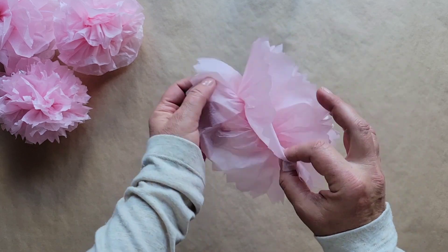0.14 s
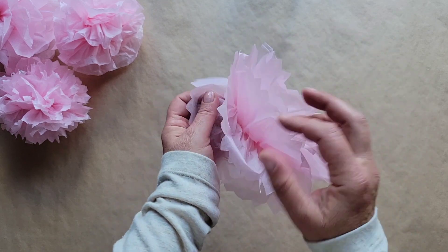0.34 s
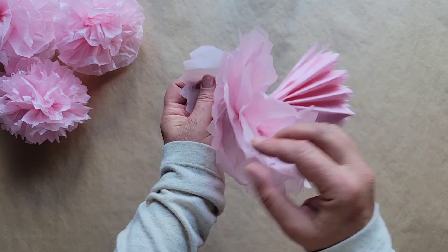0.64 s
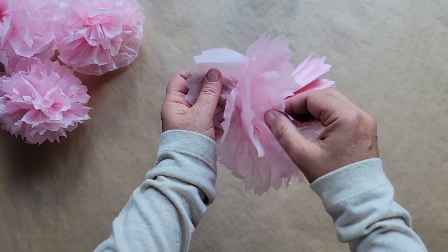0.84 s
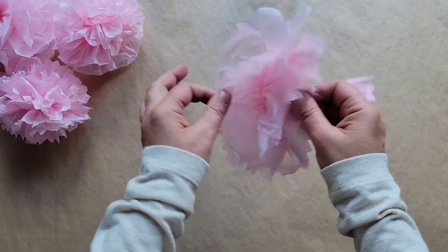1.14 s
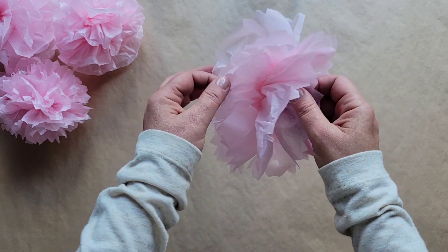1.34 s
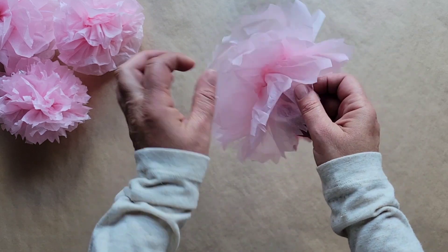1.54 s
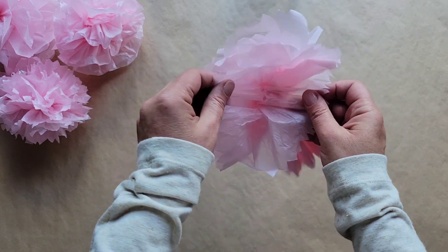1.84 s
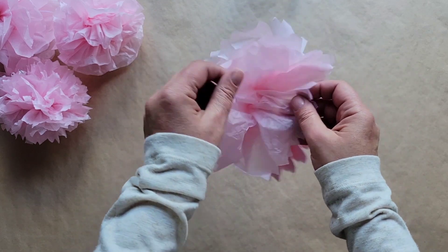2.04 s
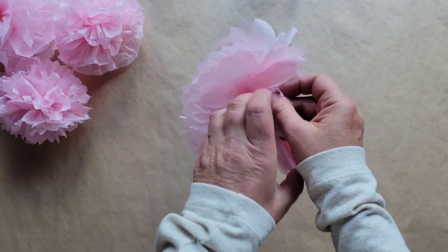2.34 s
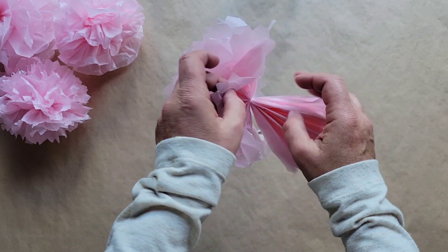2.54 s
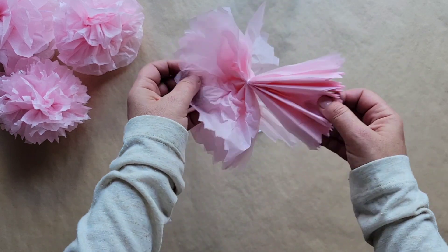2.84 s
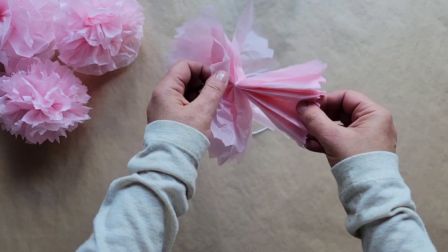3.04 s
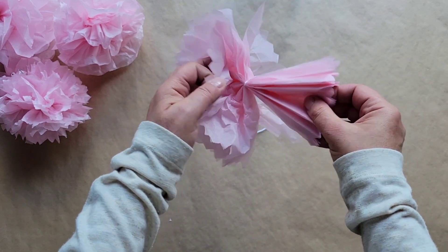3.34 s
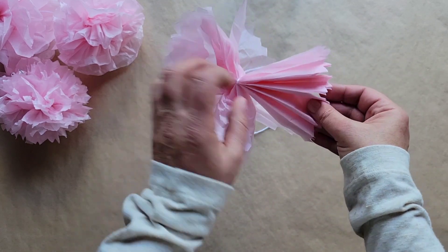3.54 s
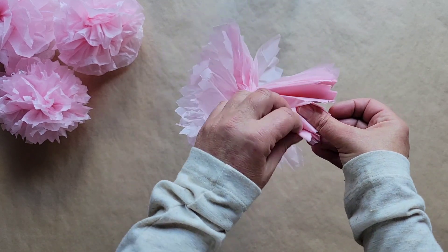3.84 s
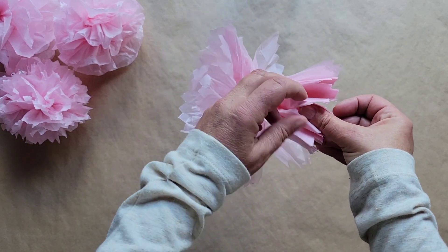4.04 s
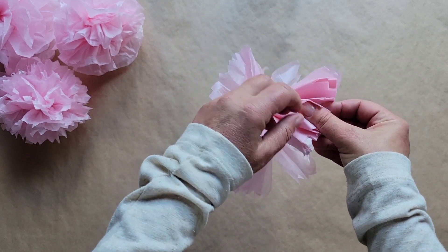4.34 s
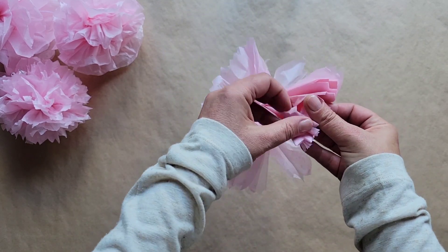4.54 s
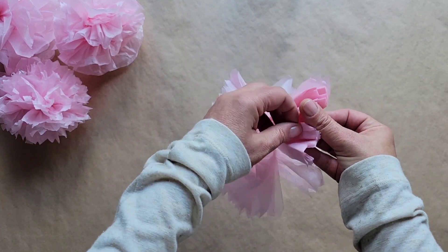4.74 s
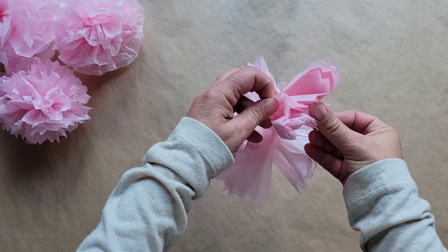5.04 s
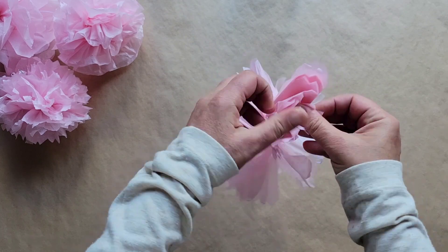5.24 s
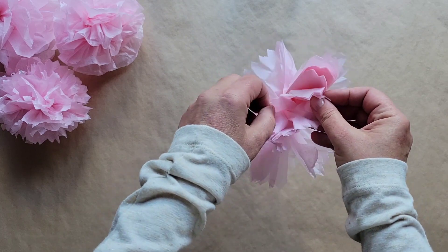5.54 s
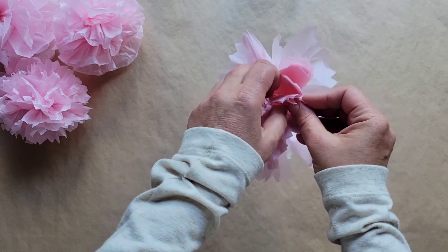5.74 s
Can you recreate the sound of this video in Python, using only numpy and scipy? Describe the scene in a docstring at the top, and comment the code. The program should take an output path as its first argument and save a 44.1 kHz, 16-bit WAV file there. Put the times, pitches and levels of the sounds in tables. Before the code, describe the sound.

Two hands separate and fluff a tissue-paper flower close to a stereo microphone pair. Crisp, papery crinkles come in quick uneven strokes, with sharp little crease snaps, light hollow flexing and soft low puffs of air. The first three seconds are busiest; around four seconds it thins to quieter rubbing, then crinkling returns, strongest near the end. Quiet indoor room, faint hush.

```python
"""The layers of a tissue-paper flower, pulled apart and fluffed by two hands, close above a craft table in a quiet room.
Each finger stroke drives a swarm of tiny buckles: noise bursts filtered into crinkle, crisp treble, rubbed pleats
and the hollow flexing of the petals. Single creases snap as short ringing bursts and jolt their petal.
Opening petals push soft puffs of low noise, over the room's faint hush, on a microphone pair:
alike in the bass and more independent in the treble."""
import sys
import numpy as np
from scipy import signal
from scipy.fft import rfft, irfft
from scipy.io import wavfile
from scipy.ndimage import uniform_filter1d

SR = 44100
rng = np.random.default_rng(int(sys.argv[2]) if len(sys.argv) > 2 else 0)


def transcribe(signal):
    """Save signal, clipped to [-1, 1], as a 16-bit WAV file at the path in sys.argv[1]."""
    frames = np.atleast_2d(signal).T
    limited = np.clip(frames, -1, 1)
    pcm = np.round(limited * 32767).astype(np.int16)
    wavfile.write(sys.argv[1], SR, pcm)


N = 260626
TIME = np.arange(N) / SR   # s

# Strokes of the fingers through the paper: start t/s, length t/s, relative crinkle level/dB,
# swell over the stroke/dB, crisp treble against crinkle level/dB, flexing against crinkle level/dB
FINGER_STROKES = [(0.0, 0.049, -34, 1.5, 3.5, -8.0), (0.095, 0.225, -43.5, -6.5, 1.5, -15.5),
                  (0.219, 0.008, -42, 9, -12, -3.5), (0.336, 0.04, -52.5, 3.5, -7, -19),
                  (0.412, 0.042, -51.5, 1.0, 7.5, -11), (0.466, 0.16, -41.5, -8.5, 1.5, -9),
                  (0.686, 0.031, -63, -6, 0, -29), (0.8, 0.014, -42.0, -1, 10, -15),
                  (0.827, 0.11, -47.5, -9, 0.5, -9), (1.013, 0.019, -54, 0.0, 1.5, -7),
                  (1.067, 0.035, -37.5, 0, 5, -12.5), (1.123, 0.04, -35.5, -4.5, 3, -10.5),
                  (1.189, 0.15, -48.0, 4.5, 1, -13.5), (1.366, 0.029, -40, 5, -1.5, -6.5),
                  (1.456, 0.035, -42.5, 1.5, 0, -12.5), (1.65, 0.026, -51.5, 3, -2, -10.5),
                  (1.694, 0.056, -43, 2, 3.0, -12.0), (1.761, 0.045, -35.5, 2.5, 3.5, -10.5),
                  (1.841, 0.15, -44.5, 0.5, 2.0, -12.5), (2.015, 0.025, -36, 7.5, 1, -10.5),
                  (2.093, 0.053, -46.0, 2.5, -1.5, -13), (2.169, 0.112, -57.0, -0.5, -1.0, -15),
                  (2.328, 0.014, -39.5, -3.5, -1, -16.5), (2.365, 0.082, -45.5, 8, 3.5, -12.5),
                  (2.467, 0.13, -49, 4, 1, -11.5), (2.642, 0.134, -53, 3, -3.5, -11.5),
                  (2.802, 0.034, -40.5, 3, -3.5, -15), (2.877, 0.1954, -44.5, 10, 1.5, -12),
                  (3.119, 0.13, -40.5, 6, -3, -10.5), (3.282, 0.064, -42.5, 6, -2, -10.5),
                  (3.368, 0.073, -48, 0, -1, -11.5), (3.473, 0.108, -59.0, 8.5, 4.5, -7),
                  (3.601, 0.081, -43.5, -3.5, 0, -17.5), (3.732, 0.11, -56, -4.0, 3.5, -14.0),
                  (3.925, 0.076, -67, -0.5, 5, -5.5), (4.075, 0.086, -52.5, -9, -2.5, -12),
                  (4.238, 0.051, -56.5, 0.5, -10, -8.5), (4.347, 0.238, -50.5, 3, -4.5, -13.0),
                  (4.62, 0.026, -44.0, 5.5, -4, -17), (4.688, 0.11, -53.5, 8, -1.0, -27),
                  (4.827, 0.23, -42.5, 2, -2, -19.5), (5.136, 0.039, -45, 5, -3, -15.0),
                  (5.211, 0.14, -54.5, -7.5, 1, -17.5), (5.337, 0.237, -45.5, 10.5, -2.5, -14.5),
                  (5.614, 0.142, -45.5, -6, -1.0, -14.5), (5.772, 0.08, -33.0, 5.5, -1, -14.5),
                  (5.904, 0.015, -41.5, -3.5, -4, -12)]
# Fingertips in the folded pleats, a curve: t/s, rub against crinkle level/dB,
# hollow note against flexing level/dB, tilt of the pleat resonances/(dB per octave)
PLEAT_RUB = [(0, -14, -9.5, 0), (1.0, -8.5, -5, -5), (2.3, -11, -5.5, -4), (3.3, -10.5, -11, -3),
             (3.7, -9, -5, 2), (4.0, -1, 1, -9), (4.15, 7, 4, -8), (4.6, 0, 4, -10), (4.8, 8, -7, 2),
             (5.05, 5, -20.5, -4), (5.15, -0.5, -14, -3), (5.91, -25, -7.5, -8)]
# Resonances of the rubbed pleats: f/Hz, width f/Hz, relative level/dB
PLEAT_RESONANCES = [(1940, 460, 0.5), (2960, 100, 6), (3406, 420, 12), (4750, 1200, 6.5)]
# Stiff creases that snap through: t/s, relative level/dB, pitch centre f/Hz, left-right level/dB
CREASE_SNAPS = [(.008, -18, 5300, 1), (.2313, -23, 2800, -1), (.2947, -24, 2200, 1), (.3229, -26, 1800, 2),
                (.41, -28, 9000, 0), (.46, -22, 9000, 0), (.467, -16, 9100, 2), (.689, -42, 4600, -1),
                (.7665, -45, 9200, 2), (.795, -18, 11700, -2), (1.013, -36, 4800, 1), (1.135, -22, 1400, 0),
                (1.328, -26, 8800, 1), (1.459, -25, 7100, 0), (1.4834, -25, 5500, 1), (1.624, -32, 8900, 2),
                (1.692, -23, 8700, -1), (1.937, -19, 9400, 0), (1.969, -22, 10800, 1),
                (1.975, -22, 10800, 2), (2.2964, -40, 5100, 0), (2.321, -26, 3400, 0),
                (2.421, -23, 8900, -1), (2.627, -31, 1800, 0), (2.804, -23, 4700, 1), (2.83, -16, 5400, 2),
                (2.8366, -21, 10000, 2), (3.04, -22, 8000, 2), (3.16, -23, 1400, 0), (3.524, -32, 7400, -1),
                (3.594, -26, 5900, -2), (3.731, -27, 5700, -3), (3.89, -37, 6300, -4),
                (3.923, -44, 3500, -3), (4.04, -41, 5900, 0), (4.209, -39, 1500, -1),
                (4.267, -31, 5800, -2), (4.344, -34, 4800, -1), (4.395, -25, 5200, -2),
                (4.763, -29, 6900, -1), (5.262, -26, 5900, 0), (5.338, -26, 4100, -3),
                (5.45, -24, 3000, -2)]
# Petals swinging open: t/s, relative peak level/dB, swell time t/s
PETAL_PUFFS = [(.028, -48, 0.013), (.46, -58, .019), (.79, -56, 0.023), (1.085, -53, 0.011),
               (1.115, -54, 0.014), (1.375, -53, 0.015), (1.768, -47, .013), (2.036, -43.5, 0.0068),
               (2.555, -53, 0.0061), (3.048, -59, 0.012), (3.205, -53, .016), (3.3, -55, .012),
               (5.78, -59, .015), (5.86, -54, .009)]

# Colour of the papery crinkle: f/Hz, relative level/dB
CRINKLE_SPECTRUM = [(550, -36), (780, -14), (880, -11), (965, -2), (1040, -6.5), (1200, -0.5), (1430, -5),
                    (1620, -0.5), (2120, -7), (3150, -4), (3800, -8.5), (4700, -5.5), (7000, -11.5),
                    (16000, -20.5)]
# Colour of the crisp treble: f/Hz, relative level/dB
CRISP_SPECTRUM = [(40, -41), (150, -26), (1500, -21), (3500, -7.5), (5500, -3), (7000, -3.5), (9000, -1.5),
                  (11500, -4), (13000, -0.5), (16000, -4.5)]
# Colour of whole petals flexing: f/Hz, relative level/dB
FLEX_SPECTRUM = [(70, -35.5), (130, -24), (205, -15), (243, -3.5), (275, -6), (355, -3.5), (440, -1),
                 (510, 5), (600, 0), (760, -10), (1100, -28.5), (2000, -79.5)]
# Colour of the snapping creases: f/Hz, relative level/dB
SNAP_SPECTRUM = [(80, -21), (350, -5.5), (800, -12.5), (1400, -4), (3300, -8), (6000, -10), (16000, -5.5)]
# Colour of the pushed air: f/Hz, relative level/dB
PUFF_SPECTRUM = [(25, -34), (60, 0), (100, 2.5), (150, -5), (230, -1), (400, -15), (900, -48)]
# Colour of the room hush: f/Hz, relative level/dB
ROOM_SPECTRUM = [(20, -8), (60, 4), (130, -10.5), (350, 1.5), (700, -9), (1500, -9), (4000, -7),
                 (16000, -16.5)]
# Width of the microphone pair: f/Hz, side against mid level/dB
PAIR_WIDTH = [(60, -15), (140, -13), (250, -20), (360, -22), (500, -14), (750, -9.5), (1400, -8.8),
              (2500, -5.5), (4500, -3.2), (8000, -.3), (16000, 0)]
# Balance of the microphone pair: f/Hz, left against right level/dB
PAIR_BALANCE = [(300, 1), (1500, -1.5), (3200, 0.3), (4400, -4), (6000, -0.5), (7500, -0.5), (8700, 5),
                (10500, 2), (13000, 0), (16000, 3.5)]

# How each voice follows a stroke: attack/(dB per s), release/(dB per s), relative level while only held/dB
CRINKLE_RESPONSE = (690, 410, -69)
CRISP_RESPONSE = (880, 540, -74)
FLEX_RESPONSE = (560, 364, -76)
CATCH_DB, FLEX_WAVER_DB = 0.96, 1.37   # rms wander: paper catches and gives, so a stroke is never even
PLEAT_PIVOT_HZ = 3000   # the pleat tilt turns about this pitch
HOLLOW_HZ, HOLLOW_WIDTH_HZ = 353.3, 118   # width of each of two passes
ROOM_DB = -66.5
# Lesser creases: TICK_DB is their middle level under a crinkle of TICK_AT_DB; they follow a share of its swing
TICKS_PER_S, TICK_DB, TICK_AT_DB, TICK_FOLLOWS, TICK_SPREAD_DB = 12, -36, -50, .75, 2
TICK_HZ = (2000, 10000)   # lowest and highest pitch
THUMP_DB, THUMP_HZ = -1, 1474   # jolt gain for a crease of this pitch; higher creases jolt less
CUTOFF_HZ = 15900


def from_db(db):
    """Decibels become an amplitude ratio."""
    return 10 ** (np.asarray(db) / 20)


def rms_one(x):
    """Scales a signal to an rms of 1."""
    return x / np.sqrt(np.mean(x ** 2) + 1e-20)


def in_time(rows):
    """The columns of a curve, sample by sample."""
    s, *columns = np.transpose(rows)
    return [np.interp(TIME, s, column) for column in columns]


def wander(span_s):
    """Chance that holds for about this long; spread 1."""
    steps = rng.standard_normal(N // 20)
    return np.sqrt(3 / 2) * np.interp(TIME / span_s, np.arange(len(steps)), steps)


def resonance(x, hz, width_hz):
    """Two-pole band-pass with gain 1 on top."""
    r = np.exp(-np.pi * width_hz / SR)
    feedback = [1, -2 * r * np.cos(2 * np.pi * hz / SR), r * r]
    return signal.lfilter(np.array([1, 0, -1]) * (1 - r * r) / 2, feedback, x)


def colour(x, points, power=1, size=4096):
    """Causal (minimum-phase) filter that follows a table of f/Hz, level/dB."""
    hz, db = np.transpose(points)
    log_hz = np.log(np.arange(size // 2 + 1) * SR / size + 1)
    log_gain = np.log(from_db(np.interp(log_hz, np.log(hz), db)))
    # folding the cepstrum forward makes the response causal
    cepstrum = irfft(power * log_gain)
    cepstrum[1:size // 2] *= 2
    cepstrum[size // 2 + 1:] = 0
    response = irfft(np.exp(rfft(cepstrum)))
    return signal.oaconvolve(np.atleast_2d(x), response[None], axes=1)[:, :N]


def stereo(pair):
    """Microphone pair: two unrelated signals become left and right, alike in the bass, independent in the treble."""
    mid, side = pair[0], colour(pair[1], PAIR_WIDTH)
    # takes back the power that the side signal adds
    even = [(hz, -10 * np.log10(1 + from_db(db) ** 2)) for hz, db in PAIR_WIDTH]
    left, right = colour(np.vstack([mid + side, mid - side]), even)
    left = colour(left, PAIR_BALANCE, power=1 / 2)
    right = colour(right, PAIR_BALANCE, power=-1 / 2)
    return np.vstack([left, right])


def steady(x, span_s):
    """Evens out the slow level and keeps the fine grain."""
    power = uniform_filter1d(np.mean(x ** 2, axis=0), max(int(span_s * SR), 2))
    return x / np.sqrt(np.abs(power) + 1e-12)


def fade(energy, t60):
    """Spreads each parcel of energy over an exponential decay of 60 dB in t60 seconds."""
    r = from_db(-120 / (t60 * SR))
    return signal.lfilter([1 - r], [1, -r], energy + 1e-18)


def scatter(x, echo_db, t60):
    """Moving petals, table and room return a short diffuse tail that never repeats."""
    tail = np.sqrt(fade(x ** 2, t60)) * rng.standard_normal(x.shape)
    return x + from_db(echo_db) * tail


def folds(x, ring_db, t60, size=8192):
    """Cavities between the petals ring briefly; they change shape as the hands move, so no pitch holds."""
    t = TIME[:SR // 60]
    out, hop = np.zeros((2, N + 3 * size)), size // 2
    padded = np.pad(x, ((0, 0), (hop, size)))
    blend = np.sqrt(signal.get_window("hann", size))
    for at in range(0, N + hop, hop):
        cavity = rng.standard_normal((2, len(t))) * from_db(-60 * t / t60)
        cavity *= from_db(ring_db) / np.sqrt(np.sum(cavity ** 2, axis=1, keepdims=True))
        cavity[:, 0] += 1   # direct sound
        rung = signal.fftconvolve(padded[:, at:at + size] * blend, cavity, axes=1)
        out[:, at:at + size + len(t) - 1] += rung
    return out[:, hop:hop + N]


def handling(response, against_db=0):
    """Level/dB of one voice of the sheet: each stroke rises fast, swells or sags while it lasts, and dies away."""
    attack_db_per_s, release_db_per_s, held_db = response
    t = TIME[::32]
    start, length, level_db, swell_db = np.transpose(FINGER_STROKES)[:4, :, None]
    age = t - start
    db = level_db + np.reshape(against_db, (-1, 1)) + swell_db * (np.clip(age / length, 0, 1) - .5)
    db = db - attack_db_per_s * np.maximum(-age, 0)
    db = db - release_db_per_s * np.maximum(age - length, 0)
    power = np.sum(from_db(db) ** 2, axis=0) + from_db(held_db) ** 2
    return np.interp(TIME, t, 10 * np.log10(power))


def buckles(level_db, per_s, rate_growth, spread_db, clump_db, shift_db, focus, t60, count=7):
    """Buckles come in little avalanches, more in a harder pull; each is a fresh burst from one facet of the sheet."""
    rate = per_s * from_db(rate_growth * (level_db - np.median(level_db)))
    size_db = spread_db * np.minimum(rng.exponential(1, N), 4)
    sizes = from_db(size_db + clump_db * wander(span_s=.006))
    energy = sizes ** 2 * (rng.random(N) < rate / SR)
    dealt, out = rng.integers(0, count, N), 0
    for k, hz in enumerate(np.geomspace(1250, 13000, count)):
        burst = np.sqrt(fade(energy * (dealt == k), t60)) * rng.standard_normal((2, N))
        # the strain moves from facet to facet, so the colour shifts
        load = from_db(shift_db * wander(span_s=.05))
        out = out + burst + focus * load * resonance(burst, hz, hz / 3)
    scattered = scatter(out, echo_db=-6, t60=.07)
    return stereo(folds(scattered, ring_db=-7, t60=.02))


def rustle(crinkle_db, crisp_db, flex_db):
    """One swarm of buckles sounds as papery crinkle, crisp treble, rubbed pleats and hollow flexing of whole petals."""
    rub_db, hollow_db, tilt_db = in_time(PLEAT_RUB)
    swarm = buckles(crinkle_db, per_s=2400, rate_growth=.55, spread_db=2.0, clump_db=0.5,
                    shift_db=3.0, focus=0.48, t60=0.0038)
    pleats = 0
    for hz, width_hz, db in PLEAT_RESONANCES:
        gain = from_db(db + tilt_db * np.log2(hz / PLEAT_PIVOT_HZ))
        pleats = pleats + gain * resonance(swarm, hz, width_hz)
    crinkle = rms_one(colour(swarm, CRINKLE_SPECTRUM))
    crinkle = steady(crinkle + from_db(rub_db) * rms_one(pleats), span_s=0.052)
    crisp = steady(colour(swarm, CRISP_SPECTRUM), span_s=0.047)
    paper = from_db(crinkle_db - 0.08) * crinkle + from_db(crisp_db - 0.35) * crisp
    # a narrow hollow note joins the flexing, stronger or weaker with the curve
    flex = rms_one(colour(swarm, FLEX_SPECTRUM))
    note = resonance(flex, HOLLOW_HZ, HOLLOW_WIDTH_HZ)
    note = resonance(note, HOLLOW_HZ, HOLLOW_WIDTH_HZ)
    flex = steady(flex + from_db(hollow_db) * rms_one(note), span_s=0.056)
    flex = from_db(flex_db + 0.2 + FLEX_WAVER_DB * wander(span_s=.03)) * flex
    return from_db(CATCH_DB * wander(span_s=.02)) * (paper + flex)


def room():
    """The faint, dull hush of the room: steady coloured noise."""
    hush = colour(rng.standard_normal((2, N)), ROOM_SPECTRUM)
    return from_db(ROOM_DB) * rms_one(stereo(hush))


def ticks(crinkle_db):
    """Lesser creases give way at random, louder under a harder stroke; rows as in CREASE_SNAPS."""
    when, size, pitch, place = rng.random((round(TICKS_PER_S * N / SR), 4)).T
    swing_db = crinkle_db[(when * N).astype(int)] - TICK_AT_DB
    level_db = TICK_DB + TICK_FOLLOWS * swing_db + TICK_SPREAD_DB * (2 * size - 1)
    low_hz, high_hz = TICK_HZ
    hz = low_hz * (high_hz / low_hz) ** pitch
    pan_db = 2 * (2 * place - 1)
    return list(zip(when * N / SR, level_db, hz, pan_db))


def facet(hz, t60, focus):
    """One crease rings: a brief noise burst of dense modes, stressed around its pitch; rms 1 over the first millisecond."""
    t = TIME[:SR // 50]
    burst = rng.standard_normal((2, len(t))) * from_db(-60 * t / t60)
    burst = burst + focus * resonance(burst, hz, hz / 2)
    return burst / np.sqrt(np.mean(burst[:, :SR // 1000] ** 2))


def snaps(creases):
    """A stiff crease flips over with one sharp tick; larger, lower ones ring longer and jolt the petal more."""
    out, jolts = np.zeros((2, 2, N + SR))
    for s, level_db, hz, pan_db in creases:
        mid, side = facet(hz, t60=.008 * np.sqrt(6000 / hz), focus=2.2)
        lean = (from_db(pan_db) - 1) / (from_db(pan_db) + 1)   # positive is left
        tick = from_db(level_db) * np.array([mid, side + lean * mid])
        at = max(round(s * SR), 0)
        out[:, at:at + len(mid)] += tick
        jolts[:, at:at + len(mid)] += THUMP_HZ / hz * tick
    crack = from_db(-2.5) * colour(scatter(out, echo_db=-8, t60=.07), SNAP_SPECTRUM)
    thump = from_db(THUMP_DB) * colour(jolts, FLEX_SPECTRUM)
    return stereo(crack + thump)


def puffs():
    """Air pushed by a swinging petal swells and dies in a few hundredths of a second."""
    push = np.zeros(N)
    for s, peak_db, swell_s in PETAL_PUFFS:
        age = np.clip((TIME - s) / swell_s, 0, 20)
        push += from_db(peak_db) * age * np.exp(1 - age)
    air = stereo(colour(rng.standard_normal((2, N)), PUFF_SPECTRUM))
    return from_db(-7) * push * steady(air, span_s=.04)


def scene():
    """The same strokes drive every voice of the sheet; the room, creases and puffs of air join in."""
    *_, treble_db, flexing_db = np.transpose(FINGER_STROKES)
    crinkle_db = handling(CRINKLE_RESPONSE)
    crisp_db = handling(CRISP_RESPONSE, treble_db)
    flex_db = handling(FLEX_RESPONSE, flexing_db)
    paper = rustle(crinkle_db, crisp_db, flex_db)
    return paper + room() + snaps(CREASE_SNAPS + ticks(crinkle_db)) + puffs()


def record(dry):
    """The top is cut steeply by an elliptic low-pass."""
    top_cut = signal.ellip(12, .1, 80, CUTOFF_HZ, fs=SR, output="sos")   # ripple and stopband in dB
    return signal.sosfilt(top_cut, dry)


dry = scene()
out = record(dry)
transcribe(out)
```